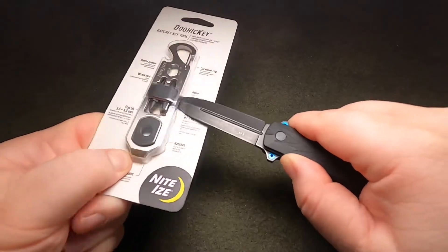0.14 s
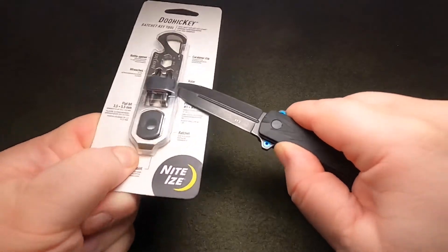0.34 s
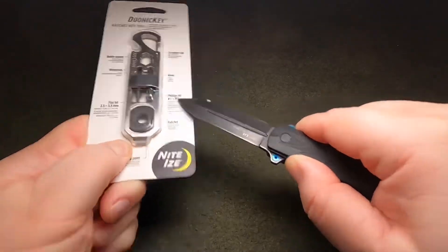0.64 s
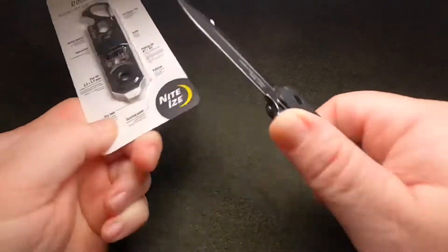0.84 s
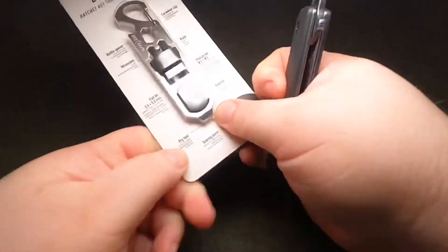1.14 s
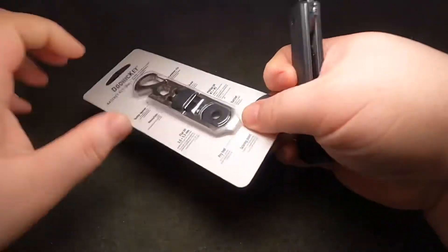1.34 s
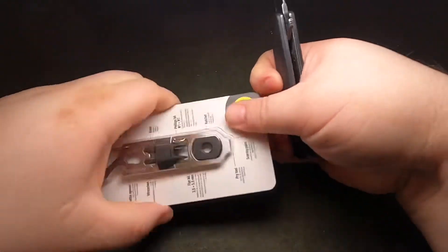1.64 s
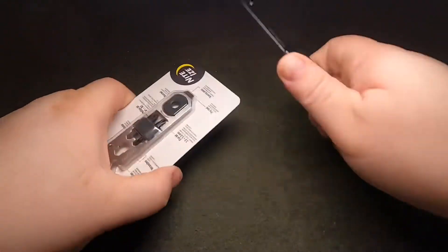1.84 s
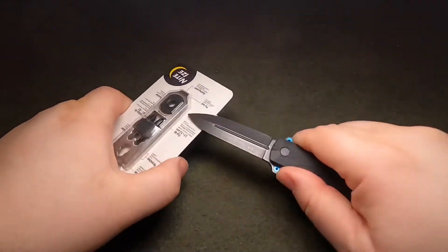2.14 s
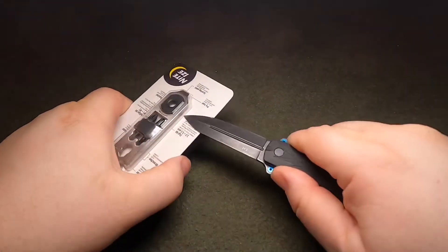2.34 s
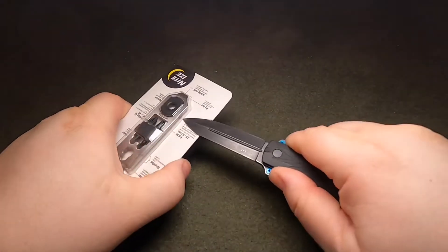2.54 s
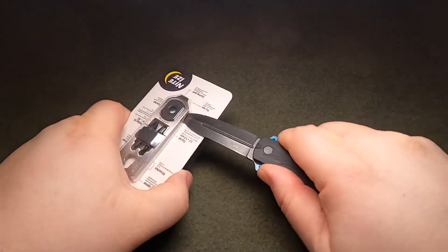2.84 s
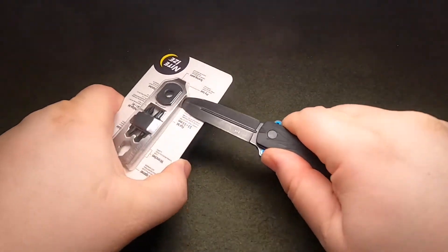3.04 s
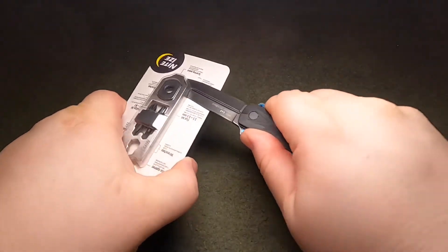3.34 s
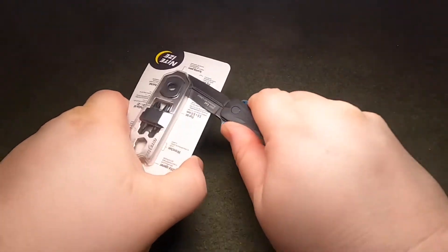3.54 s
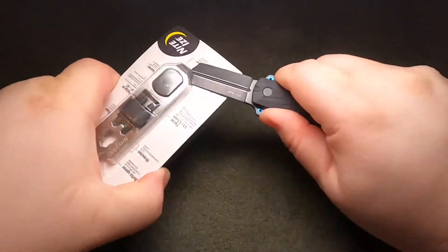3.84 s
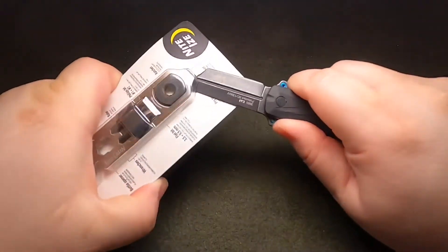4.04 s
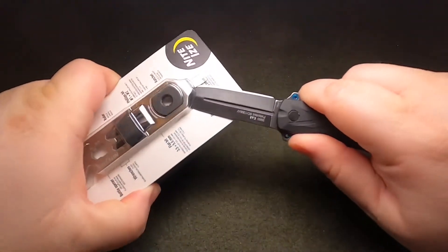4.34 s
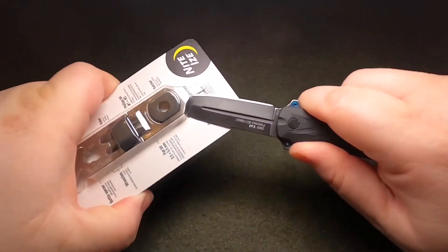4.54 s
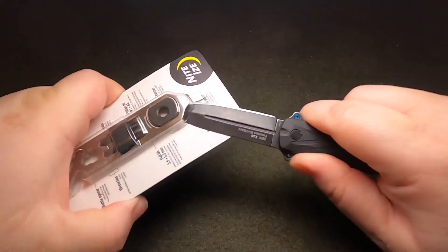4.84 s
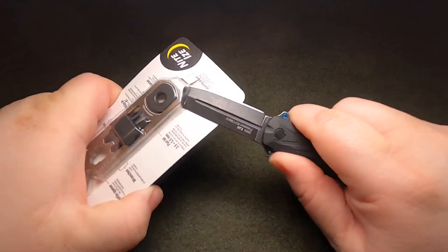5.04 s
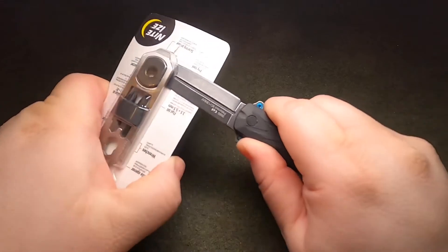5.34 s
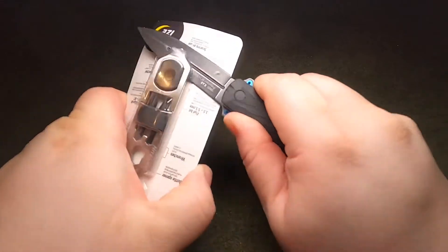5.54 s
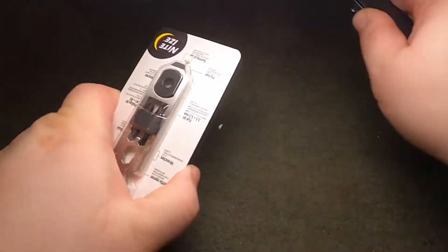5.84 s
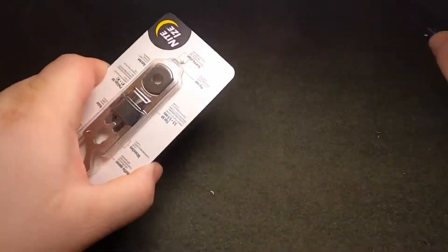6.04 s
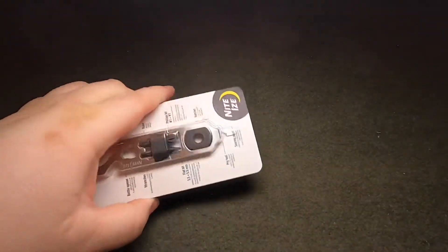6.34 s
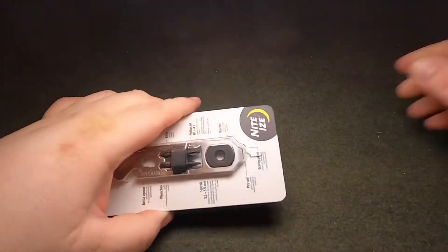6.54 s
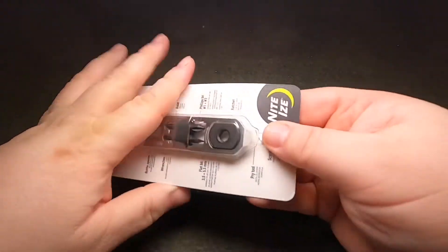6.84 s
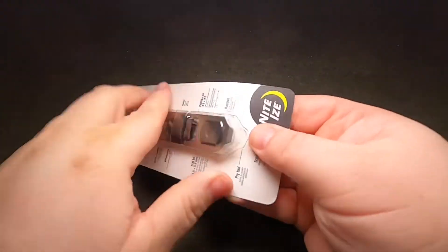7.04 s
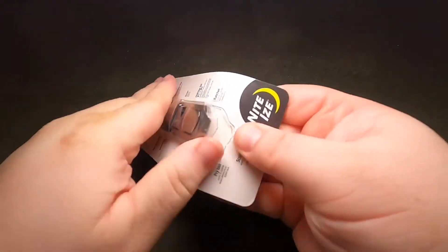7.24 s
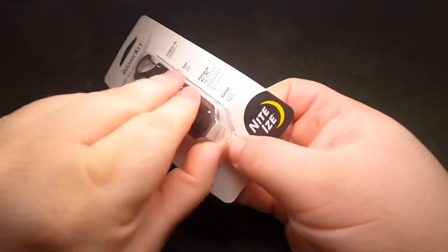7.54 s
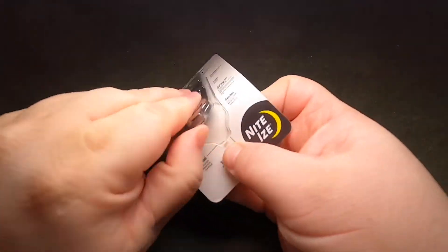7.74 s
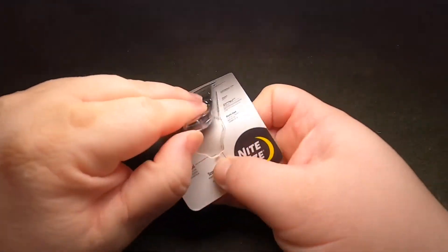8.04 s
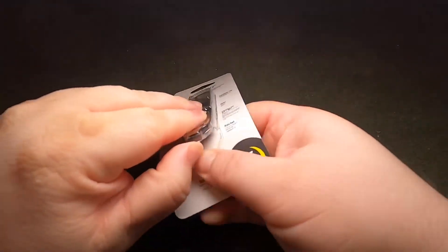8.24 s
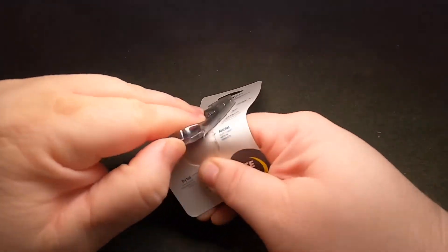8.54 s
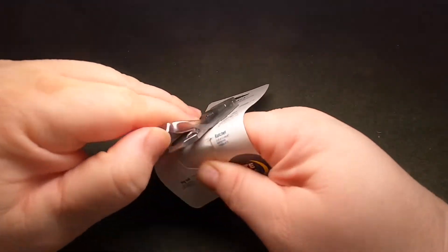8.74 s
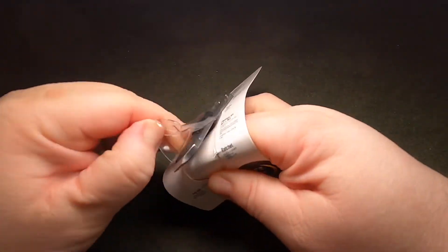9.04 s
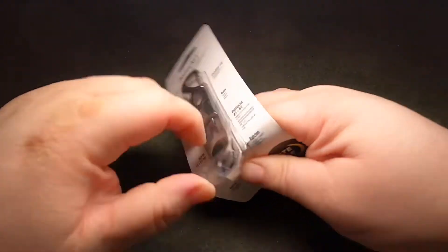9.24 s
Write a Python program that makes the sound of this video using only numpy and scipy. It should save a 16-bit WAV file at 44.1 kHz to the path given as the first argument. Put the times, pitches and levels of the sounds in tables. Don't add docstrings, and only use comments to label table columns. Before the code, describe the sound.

Sharp plastic snaps and dry scrapes as a knife works around stiff packaging, then crackling as fingers pry it open, with low handling bumps.

```python
import sys
import numpy as np
from scipy import signal
from scipy.fft import rfft, irfft, next_fast_len
from scipy.io import wavfile
from scipy.ndimage import uniform_filter1d

SR = 44100
rng = np.random.default_rng(int(sys.argv[2]) if len(sys.argv) > 2 else 0)


def generate_wav(sig):
    pcm = np.round(np.clip(np.atleast_2d(sig).T, -1, 1) * 32767).astype(np.int16)
    wavfile.write(sys.argv[1], SR, pcm)


def makeup_ratio(level_db):
    decades = np.asarray(level_db, float) / 20
    return 10 ** decades


N = 414099

# [frequency_hz, level_db]
HISS_COLOUR = [(30, -4), (60, -2), (150, -3.5), (182, -6), (249, -1.5), (321, -4.5), (448, -7.5),
               (716, -13.5), (2500, -26.5), (9080, -32), (16000, -36)]
# [frequency_hz, width_hz, rms_db]
HUM = [(119.6, 3.6, -67), (238, 6, -72.5), (445, 14, -75)]

# [delay_s, level_db]
ECHOES = [
    (.008, -18.5),
    (0.014, -23.5),
    (0.0189, -25.5),
]
# [frequency_hz, t60_s]
ROOM_DECAY = [(300, 0.31), (1000, 0.27), (3000, 0.34), (7000, 0.33), (14000, 0.23)]
# [frequency_hz, level_db]
ROOM_COLOUR = [(300, 4), (1000, 4), (1450, 3), (1950, 3.5), (2600, 2.5), (3300, -0.5), (4200, -1.5),
               (5200, -5), (7000, -3), (14000, -4.5)]

# [frequency_hz, width_hz, level_db]
SWAY_MODES = [(8.4, 4.7, 6.5), (13.704, 10, 9), (23.4, 5.8, -4.5), (32.3, 18, -18)]
# [frequency_hz, t60_s, level_db]
STAND_MODES = [(2.19, 2, -15.5), (9.53, 2.2, -16), (16.225, 2.98, 0.5), (23.02, 1.07, -1), (27, 1.5, -10.5),
               (33.2, .8, -18)]
# [middle_s, level_db]
NUDGES = [(0.152, -21), (1.7, -56), (2.892, -40.5), (3.15, -38), (3.8, -42.5), (4.101, -40), (5.351, -39),
          (5.7, -37.5), (7.5, -43), (7.9, -35), (8.5, -34.5), (9.051, -36.5), (9.27, -37.5)]
# [start_s, level_db]
JOLTS = [(1.016, -23), (1.198, -44), (6.401, -18), (6.709, -24), (8.93, -37.5), (9.2, -30.5)]
# [start_s, peak_db, pitch_hz, t60_s]
BUMPS = [(.15, -44, 69.4, 0.18), (1.018, -26, 48, .12), (1.018, -31, 95, 0.072), (1.018, -41.5, 235, 0.13),
         (1.047, -24.5, 64.5, 0.41), (1.04, -30.5, 131, 0.21), (1.14, -44.5, 330, .05),
         (1.57, -29.5, 198, 0.014), (1.67, -40, 172, 0.048), (2.851, -43, 154.2, 0.05),
         (3.139, -41, 62.5, 0.11), (5.51, -30, 62.7, 0.13), (5.51, -48, 150, 0.09),
         (5.708, -33.5, 72, 0.13), (5.708, -50.5, 139.5, 0.29), (6.44, -47, 60, .8), (7.03, -36, 42, 0.27),
         (9.0, -54, 270, .06), (6.701, -38, 132.3, 0.16), (6.71, -30, 330, 0.029),
         (7.017, -27.5, 325, 0.029), (8.749, -44, 90, 0.11), (9.198, -25.5, 112, 0.036),
         (9.3, -45, 61, 0.37), (9.36, -44, 119, .15)]

# [low_hz, high_hz]
RUB_ZONES = [(480, 1500), (1500, 7000), (7000, 16500)]
# [frequency_hz, level_db]
RUB_COLOUR = [(400, -0.5), (1000, -3.5), (1400, -2.5), (1850, 1.5), (2500, 2.5), (3300, 4), (5000, 1),
              (6500, 2), (7700, -4), (9300, -1), (12000, -9), (16000, -13.5)]
# [start_s, pressure_db, edge_db]
GRIP = [(0, -78, -8), (.8, -75.5, -3.5), (1.4, -75, -2.5), (1.998, -79, -7.5), (2.7, -81.5, -5),
        (3.3, -73, -4.5), (4.05, -74, -3.5), (4.55, -80.5, -6), (5.402, -77.5, -3), (6.001, -73, -3.5),
        (6.5, -77.5, -6), (7, -70, 0), (7.601, -71, -1.5), (8.1, -73.5, -2.5), (8.7, -71, -3),
        (9.13, -77.5, -6.5), (9.39, -89, 8)]
# [middle_s, length_s, level_db, edge_db]
STROKES = [(1.714, 0.46, -69.5, 0.5), (3.56, 0.4, -75, -5.5), (3.767, 0.74, -72, 9),
           (5.133, 0.59, -69.5, -2), (5.49, 0.16, -59.5, -5), (5.62, 0.19, -65, -5.5),
           (5.711, 0.19, -62, -5), (6.888, 0.16, -82.5, 2), (7.19, 0.34, -64.5, 4.5),
           (7.529, 0.186, -89, -16), (7.73, 0.15, -81.5, -15.5), (6.75, 0.15, -76, -10.5),
           (3.573, .12, -75, -7.5), (1.65, 0.18, -83, -14.5), (8.282, 0.37, -70.5, 8.5),
           (8.97, 0.11, -82, -13.5), (9.277, 0.28, -62, -7), (9.347, 0.14, -56, -5.5)]
# [start_s, length_s, level_db, edge_db]
SCUFFS = [(0.138, 0.039, -48.5, -7.5), (0.154, 0.099, -72, -12), (0.353, 0.062, -65.5, -3.5),
          (.613, 0.045, -53.5, -2), (1.009, 0.16, -54.5, -1), (1.562, 0.035, -66.5, -8),
          (2.841, 0.049, -54.5, -2.5), (3.121, 0.047, -53, -1), (3.413, 0.065, -71.5, 0),
          (3.533, 0.066, -66, 4), (3.678, .065, -60, 0.5), (4.093, 0.097, -67.5, -0.5),
          (4.183, 0.044, -65.5, 2), (4.293, 0.044, -65, 0), (4.928, 0.043, -69, 3), (5.054, 0.087, -68, -1),
          (5.474, .036, -52.5, 2.6), (5.524, 0.022, -44, 5.5), (5.661, 0.05, -53, 0.5),
          (6.7, .08, -59, -4.5), (6.857, 0.041, -81, 5), (6.92, 0.023, -63.5, -4),
          (7.02, 0.0244, -57.5, -4.5), (7.096, 0.031, -57.5, -2.5), (8.358, 0.11, -79, 15.5)]
# [card_db, shell_db, rim_db]
ZONE_DB = (-4, 0.03, -1)
EDGE_SHARE = (-1.61, 0.038, 1.1)
# [middle_s, length_s, level_db, pitch_hz]
CREAKS = [(7.255, .12, -62, 4100), (7.24, .1, -66, 7000), (5.163, .03, -62, 5500), (5.112, .04, -60, 2400),
          (5.13, .14, -60, 900), (8.98, .12, -54, 3300), (5.74, .08, -50, 5600), (3.71, .05, -56, 1800),
          (3.44, .09, -61, 1950), (7.46, .05, -50, 4600), (5.74, .1, -47, 1400), (3.57, .07, -60, 1300),
          (4.972, .03, -58, 3300), (9.211, .026, -40, 3900), (9.211, .024, -43, 5900),
          (7.52, .17, -57, 2250), (7.5, .14, -60, 700), (7.72, .12, -60, 700), (8.775, .07, -60, 2800)]

# [start_s, peak_db, pitch_hz, t60_s]
RINGS = [(.153, -43, 1073, .2), (.153, -56, 775, .11), (.153, -50, 1390, .11), (.153, -42, 2700, .13),
         (.153, -52, 2050, .1), (.615, -31.5, 1170, .09), (.615, -45, 1990, .12), (.615, -44, 1670, .15),
         (1.017, -29, 1530, .035), (1.396, -56, 1080, .13), (2.203, -57, 1750, .05),
         (2.941, -52, 1162, .09), (3.56, -55, 1032, .25), (3.94, -56, 3630, .12), (5.057, -39, 2340, .08),
         (5.486, -44.5, 920, .08), (5.539, -35, 893, .26), (5.539, -42.5, 1076, .2), (5.539, -46, 678, .2),
         (5.706, -31, 690, .04), (5.712, -39, 679, .23), (5.712, -41, 892, .25), (5.712, -47, 1360, .2),
         (5.712, -40, 1748, .2), (5.73, -52, 3370, .3), (7.13, -56, 920, .2), (7.445, -52.5, 2150, 0.47),
         (7.445, -53, 2450, 0.18), (7.13, -50, 4050, .3), (7.13, -50, 1920, .25), (7.45, -50, 5100, .2),
         (8.925, -50.5, 740, .12), (8.925, -45, 2470, .25), (8.925, -45, 4000, .22),
         (8.925, -47, 3348, .35), (9.197, -24, 804, .04), (9.362, -38, 645, .05), (5.7068, -17, 850, .02),
         (5.7055, -22, 1600, .015), (8.92, -41, 6300, .03), (6.71, -48.5, 1680, .08)]
# [frequency_hz, width_hz, level_db]
SHIVER_MODES = [(1900, 340, -4.5), (2450, 610, -4), (3270, 650, -1), (4150, 620, 2.5), (5100, 1200, -0.5),
                (6160, 1000, -6)]

# [rise_s, t60_s]
ZONE_TIMES = [
    (.003, .045),
    (.0008, .015),
    (.0003, .008),
    (.0002, .006),
]
# [low_hz, high_hz]
CRACK_ZONES = [(230, 560), (680, 1200), (1650, 7000), (7000, 12500)]
# [start_s, level_db, main_ring_hz, card_thud_db, rim_fizz_db]
CUT_CRACKS = [(0.1421, -36.5, 1620, -6, -7), (0.152, -36.5, 1035, 9, -6.5), (.614, -36, 1260, -5.5, -27),
              (1.0167, -21.5, 2450, -13, -2.5), (1.5655, -42.5, 2000, -26, -11),
              (2.2023, -41.5, 2630, -10.5, -13), (2.842, -47.5, 1060, -3, -9), (2.9394, -44.5, 1090, 0, -2),
              (3.1347, -39, 5500, -6, -0.5), (3.7017, -39.5, 4750, -23, -5), (3.72, -43.5, 3450, -20, -1),
              (3.9376, -38, 3530, -46, -2.5), (4.0025, -46, 3600, -35, -3), (4.1792, -44, 3500, -32, -1),
              (4.9566, -37.5, 1880, -9.5, -5.5), (5.056, -31.5, 2180, -27, -7),
              (5.4839, -35.5, 978, -4.5, -7.5), (5.5073, -27, 954, -8.5, -7.5),
              (5.5194, -35.5, 3745, -13, -3.5), (5.5324, -19.5, 6590, -7.5, -11.5),
              (5.5384, -24, 927, -1, -8), (5.5663, -31, 7730, -14.5, -3),
              (5.6838, -30.5, 3850, -17.5, -15.5), (5.705, -14, 3450, -7.5, -4.5)]
# [start_s, level_db, main_ring_hz, card_thud_db, rim_fizz_db]
PRY_CRACKS = [(6.7124, -41.5, 2130, -22, -14.5), (7.017, -41, 4100, -13.5, -10.5),
              (7.1083, -40.5, 1850, -26, -10), (7.122, -21, 3160, -31, -10.5),
              (7.3636, -32, 3180, -38, -6.5), (7.443, -22, 4760, -25, -5), (7.6534, -36.5, 2800, -18, -3),
              (7.666, -22.5, 5730, -58, -4.5), (8.177, -21.5, 3260, -20, -3),
              (8.7512, -40.5, 2090, -30.5, 5.5), (8.8977, -25.5, 7200, -40, -4.5),
              (8.9195, -19.5, 4260, -20.5, 0), (9.1965, -20, 4330, -12, -4.5),
              (9.2052, -32, 3700, -14, -21.5), (9.254, -46, 6740, -20, 0.5), (9.2814, -22, 2320, -13, -2.5),
              (9.2976, -17.5, 2300, -25, -6.5), (9.3182, -17.5, 6320, -19.5, -5.5),
              (9.362, -17, 4170, -17.5, -9)]
# [pitch_hz, level_db, pitch_hz, level_db]
PATCHES = [(2780, -7, 6790, 1), (2000, 3, 2560, -7), (1850, 1.5, 3500, 1.5), (3180, -2.5, 5920, -4),
           (3630, -4, 6600, -4.5), (1710, 0, 3800, -9), (6100, 6, 2200, 0), (6500, 2, 8950, 2),
           (2570, 0.5, 9600, -3), (6400, -3, 1500, -4.5), (6430, 0, 4800, -1), (11720, 2, 8500, -2),
           (6400, 1.5, 2700, -5), (4550, 0, 6250, 1.5), (3166, 0, 4420, -1), (1890, -1, 4000, -6),
           (6320, -1, 4800, 0), (6210, -1.5, 4360, -4), (5570, -4.5, 7170, -4.5), (7820, -0.5, 5900, -5.5),
           (2010, -0.5, 13000, -3), (5600, 2.5, 4500, -3), (3110, -2, 8800, -9), (6400, 0, 1690, 0),
           (1650, -9, 3700, -14), (5940, 2, 2160, -10.5), (2940, -1, 4210, -2.5), (3970, 1, 1950, -2.5),
           (6530, -5, 4770, -1.5), (4150, -2, 2480, -3), (1940, 1, 3800, -1), (4750, 0, 7120, 0.5),
           (8420, -5.5, 6600, -5.5), (5500, 7, 6400, 9), (9700, 0, 4470, -5.5), (10100, 5.5, 6200, 2.5),
           (3600, 1, 6060, -0.5), (5230, -7, 2340, -26), (6900, 4, 9500, 3), (5770, 2.5, 4630, 3),
           (7140, 0, 5900, 0.5), (6600, -5, 2030, -3), (1920, -11, 6400, -4)]
# [start_s, level_db, pitch_hz]
CARD_TICKS = [(.1751, -49, 846), (.1865, -58, 1090), (.194, -50, 1180), (.2183, -57, 1140),
              (.4066, -55.5, 1250), (.6845, -55, 1040), (.7628, -46, 1050), (1.1329, -51, 1040),
              (1.3279, -55.5, 870), (1.3953, -48.5, 1080), (1.457, -55.5, 790), (1.6235, -58.5, 760),
              (1.6713, -51, 1140), (2.853, -44.5, 1054), (5.423, -58.5, 960), (5.5454, -39.5, 930),
              (5.8796, -54, 734)]
# [start_s, level_db, pitch_hz]
EDGE_TICKS = [(.3615, -50, 6840), (.375, -47, 1300), (.4183, -67, 830), (.6686, -60, 1830), (.9, -54, 1900),
              (1.6174, -51.5, 1930), (1.6607, -49, 1840), (1.7654, -53, 2000), (3.1503, -47, 2500),
              (4.4823, -57.5, 1765), (5.1161, -56, 1780), (5.3293, -50.5, 4540), (5.4404, -48.5, 6870),
              (5.8794, -50, 5800), (6.0041, -45.5, 4760), (6.3108, -45.5, 1990), (6.7036, -65, 1800),
              (7.046, -48, 2530), (7.065, -50, 1700), (8.7391, -46, 2086)]
# [start_s, level_db, pitch_hz]
RIM_TICKS = [(2.834, -49, 6100),              (3.728, -54, 3450), (3.89, -58, 11100), (3.903, -54, 9340),
             (4.069, -48.5, 6500), (5.481, -41.5, 3390), (7.424, -49, 2036), (9.0892, -48, 6100),
             (9.0945, -50, 5960), (9.2105, -41, 4400), (9.2145, -40, 3800), (5.698, -38, 5400),
             (8.9105, -39, 3640),
             (5.7043, -21, 5000), (5.7056, -17, 4600), (5.7132, -30, 5500), (5.719, -30, 2900),
               (5.0655, -41, 2300), (5.066, -46, 3900), (3.7015, -45, 1700)]
# [start_s, level_db, pitch_hz]
THIN_TICKS = [(3.407, -62, 9000), (3.6265, -58, 10500), (3.587, -55, 9100), (3.486, -67, 9000),
              (3.7285, -47, 8800), (8.7889, -52, 7400), (4.94, -60, 7000), (8.928, -37, 7100),
              (8.928, -39, 9700), (3.766, -60, 7000)]
# [thud_db, fizz_db, shell_db]
CARD_TICK_DB = (1.5, -11, -4)
EDGE_TICK_DB = (-8, -10.5, 0)
RIM_TICK_DB = (-21.5, -7, 0)
THIN_TICK_DB = (-30, 0, -14)

# [frequency_hz, level_db]
SIDE_COLOUR = [(300, 1), (1200, -4), (2500, 5), (8000, -3.5), (12000, 5)]

CRACK_FILTERS = [signal.butter(4 if 600 < lo < 2000 else 2, [lo, hi], "band", fs=SR, output="sos")
                 for lo, hi in CRACK_ZONES]


def evened(x):
    return x / np.sqrt(np.mean(x ** 2) + 1e-20)


def read(points, hz):
    f, value = np.transpose(points)
    return np.interp(np.log(hz + 1), np.log(f + 1), value)


def add(mix, s, sound):
    part = mix[round(s * SR):][:len(sound)]
    part += sound[:len(part)]


def coloured(x, points, lo_hz=0, hi_hz=SR):
    size = next_fast_len(len(x))
    hz = np.fft.rfftfreq(size, 1 / SR) + 1e-3
    edges = 1 / np.sqrt((1 + (lo_hz / hz) ** 8) * (1 + (hz / hi_hz) ** 8))
    return irfft(rfft(x, size) * makeup_ratio(read(points, hz)) * edges, size)[:len(x)]


def fluctuation(count, depth_db, width):
    return makeup_ratio(depth_db * evened(uniform_filter1d(rng.standard_normal(count), width)))


def fuzzy_tone(hz, width):
    r = np.exp(-np.pi * width * 16 / SR)
    slow = rng.standard_normal(N // 8) + 1j * rng.standard_normal(N // 8)
    for _ in range(2):
        slow = signal.lfilter([1], [1, -r], slow)
    slow = slow[-(N // 16 + 2):]
    slow = np.interp(np.arange(N) / 16, np.arange(len(slow)), slow)
    return evened((slow * np.exp(2j * np.pi * hz * np.arange(N) / SR)).real)


def struck(rows, rise, detune=0):
    out, t = np.zeros(N), np.arange(SR // 2) / SR
    bent = t + np.cumsum(detune * np.ones(len(t))) / SR
    for s, db, hz, t60 in rows:
        ring = makeup_ratio(db - 60 * t / t60) * np.sin(2 * np.pi * hz * bent)
        add(out, s, ring * np.minimum(t / rise, 1))
    return out


def floor():
    hiss = makeup_ratio(-60.5) * evened(coloured(rng.standard_normal(N), HISS_COLOUR))
    t = np.arange(N) / SR
    hum = np.zeros(N)
    for hz, width, db in HUM:
        steady = np.sin(2 * np.pi * hz * t)
        hum += makeup_ratio(db) * evened(0.54 * fuzzy_tone(hz, width) + steady)
    return hiss + hum


def room(near, spread):
    taps = np.zeros(SR // 2)
    at = np.arange(330, len(taps) - 12, 12)
    taps[at + rng.integers(0, 12, len(at))] = rng.choice([-1., 1.], len(at))
    taps[100:330:12] = makeup_ratio(-12) * rng.choice([-1., 1.], 20)
    hz, t, z = signal.stft(taps, SR, nperseg=128)
    decay_db = -60 * t / read(ROOM_DECAY, hz)[:, None] + 20 * np.exp(-t / 0.0084)
    tail = signal.istft(z * makeup_ratio(decay_db), SR, nperseg=128)[1]
    wet = signal.fftconvolve(spread, makeup_ratio(-11.5) * tail / np.linalg.norm(tail))[:N]
    for s, db in ECHOES:
        add(wet, s, makeup_ratio(db) * near)
    return coloured(wet, ROOM_COLOUR)


def desk():
    sway_db, nudge_s, jolt_rise_s = -43, 0.43, 0.021
    sway = evened(sum(makeup_ratio(db) * fuzzy_tone(hz, width) for hz, width, db in SWAY_MODES))
    sway = sway / np.sqrt(uniform_filter1d(sway ** 2, 9000) + 1.3)
    lean = np.full(N, makeup_ratio(sway_db))
    for s, db in NUDGES:
        add(lean, s - nudge_s / 2, makeup_ratio(db) * np.hanning(round(nudge_s * SR)))
    t = np.arange(3 * SR) / SR
    swing = [makeup_ratio(db - 60 * t / t60) * np.sin(2 * np.pi * hz * t) for hz, t60, db in STAND_MODES]
    ring = sum(swing[1::2]) - sum(swing[::2])
    ring = ring * (1 - np.exp(-(t / jolt_rise_s) ** 2))
    jolted = np.zeros(N)
    for s, db in JOLTS:
        add(jolted, s, makeup_ratio(db) * ring)
    return lean * sway + jolted + struck(BUMPS, 0.0017)


def hand_pressure():
    s, db, edge = np.transpose(GRIP)
    t = np.arange(N) / SR
    pressure = makeup_ratio(np.interp(t, s, db) + np.outer(EDGE_SHARE, np.interp(t, s, edge)))
    moves = []
    for s, length, db, edge in STROKES:
        moves.append((s - length / 2, np.hanning(round(length * SR)), db, edge))
    for s, length, db, edge in SCUFFS:
        scuff = signal.windows.tukey(round((length + 0.0013) * SR), .45)
        scuff = scuff * makeup_ratio(np.linspace(-.5, .5, len(scuff)) * -3.5)
        moves.append((s - .004, scuff, db, edge))
    for s, move, db, edge in moves:
        for zone, share in zip(pressure, EDGE_SHARE):
            add(zone, s, makeup_ratio(db + share * edge) * move)
    return pressure * makeup_ratio(ZONE_DB)[:, None]


def rubbing():
    pressure = hand_pressure()
    grains = makeup_ratio(4.5 * np.minimum(rng.exponential(1, N), 3))
    grains = grains * (rng.random(N) < 500 / SR)
    slips = evened(signal.lfilter([1], [1, -.97], grains))
    drive = rng.standard_normal(N) * (1 + .3 * slips)
    _, _, z = signal.stft(drive, nperseg=256)
    patches = uniform_filter1d(uniform_filter1d(rng.standard_normal(z.shape), 5, 0), 22, 1)
    drive = signal.istft(z * makeup_ratio(2.2 * evened(patches)), nperseg=256)[1][:N]
    clumps = [fluctuation(N, 2, 450) for _ in RUB_ZONES]
    zones = [evened(coloured(drive, RUB_COLOUR, lo, hi)) for lo, hi in RUB_ZONES]
    return (clumps * pressure * zones).sum(0)


def creaks():
    out = np.zeros(N)
    for s, length, db, hz in CREAKS:
        noise = rng.standard_normal(SR // 4)
        patch = evened(signal.lfilter(*signal.iirpeak(hz, 6, SR), noise))
        patch = patch * fluctuation(SR // 4, 3, 200)
        swell = np.hanning(round(length * SR))
        add(out, s - length / 2, makeup_ratio(db) * swell * patch[:len(swell)])
    return out


def free_rings():
    flutter = fluctuation(N, 3, 250)
    detune = .016 * evened(np.log(flutter[:SR // 2]))
    return flutter * struck(RINGS, 0.0014, detune)


def shiver():
    level_db, scatter_db, t60_s = -33, 3, 0.39
    force, t = np.zeros((len(SHIVER_MODES), N)), np.arange(SR // 2) / SR
    for s, db, *_ in PRY_CRACKS:
        favour = rng.standard_normal(len(SHIVER_MODES))
        for mode, share in zip(force, favour):
            add(mode, s + .004, makeup_ratio(db + level_db + scatter_db * share - 60 * t / t60_s))
    grit = fluctuation(N, 1.5, 130)
    modes = [makeup_ratio(db) * fuzzy_tone(hz, width) for hz, width, db in SHIVER_MODES]
    return grit * sum(push * mode for push, mode in zip(force, modes))


def snap(db, ring_hz, thud_db, fizz_db, shell_db, chance, patches=(), damping=1):
    push_db, dense_db, patch_db = -16.5, -2, -4
    t = np.arange(len(chance)) / SR
    out = np.zeros(len(t))
    zone_levels = (thud_db + push_db, thud_db, dense_db + shell_db, fizz_db)
    for band, zone_db, (rise, t60) in zip(CRACK_FILTERS, zone_levels, ZONE_TIMES):
        zone = signal.sosfilt(band, chance)
        zone = zone * (1 - np.exp(-t / rise)) * makeup_ratio(-60 * t / t60)
        out += makeup_ratio(zone_db) * zone / np.sqrt(np.mean(zone[:180] ** 2))
    main_db = read([(1300, thud_db), (1600, 0), (6700, 0), (7300, fizz_db)], ring_hz)
    for hz, ring_db in [(ring_hz, main_db), *np.reshape(patches, (-1, 2))]:
        phase = np.pi / 2 - 16 * np.pi * hz / SR if damping > 1 else 0
        ring = np.sin(2 * np.pi * hz * t + phase) * (1 - np.exp(-t / .0004))
        ring = ring * makeup_ratio(-60 * damping * t / (.0045 + 14 / hz))
        out += makeup_ratio(ring_db + patch_db) / damping ** .5 * ring / np.sqrt(np.mean(ring[:180] ** 2))
    return makeup_ratio(db - 0.5) * out


def snaps():
    near, spread = np.zeros((2, N))
    rows = [(*row, 0) for row in CUT_CRACKS + PRY_CRACKS]
    kinds = ((CARD_TICKS, CARD_TICK_DB), (EDGE_TICKS, EDGE_TICK_DB),
             (RIM_TICKS, RIM_TICK_DB), (THIN_TICKS, THIN_TICK_DB))
    for ticks, zones_db in kinds:
        rows += [(*tick, *zones_db) for tick in ticks]
    chance = rng.standard_normal((120, 1300))
    click = signal.unit_impulse(1300, 8)
    for row, luck, patches in zip(rows, chance, PATCHES + [()] * len(rows)):
        add(near, row[0], snap(*row[1:], luck, patches))
        add(spread, row[0], snap(*row[1:], click, patches, damping=2.5))
    return near, spread


def scene():
    near, spread = snaps()
    rub = rubbing() + free_rings() + shiver() + creaks()
    pack = near + room(near, spread + 0.41 * rub) + rub + floor()
    quadrature = signal.hilbert(pack, next_fast_len(N)).imag[:N]
    trace = makeup_ratio(-35) * coloured(quadrature, SIDE_COLOUR)
    return pack + desk() + np.array([trace, -trace])


def roll_off(x):
    return signal.sosfilt(signal.butter(12, 16850, fs=SR, output="sos"), x)


def record(dry):
    edge_hz, opens_db = 15850, -57
    full = signal.oaconvolve(np.clip(dry, -1, 1), signal.firwin(255, 16800, fs=SR)[None], "same")
    low_pass = signal.firwin(1023, edge_hz, window=("kaiser", 8), fs=SR)
    low = signal.oaconvolve(full, low_pass[None], "same")
    top = full - low
    loud = uniform_filter1d((top ** 2).mean(0), 256) > makeup_ratio(2 * opens_db)
    gate = uniform_filter1d(loud * 1., 256)
    return roll_off(low + gate * top)


dry = scene()
out = record(dry)
generate_wav(out)
```